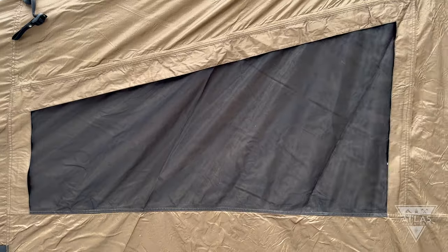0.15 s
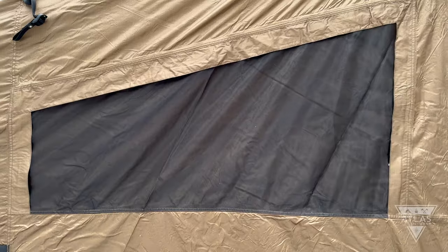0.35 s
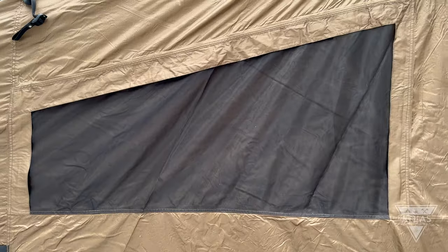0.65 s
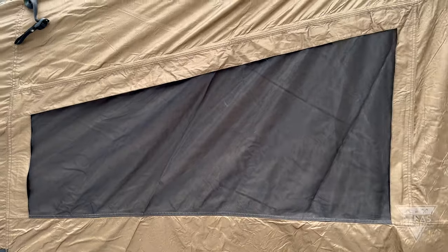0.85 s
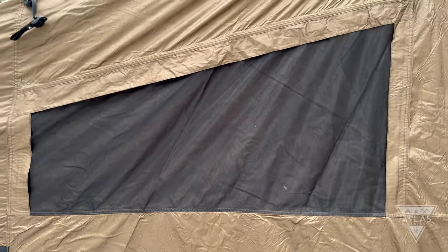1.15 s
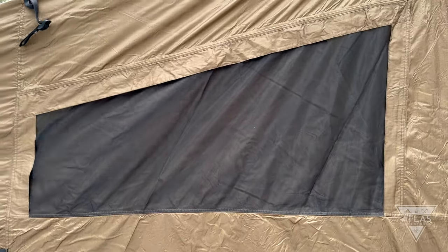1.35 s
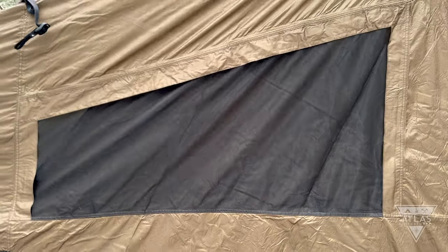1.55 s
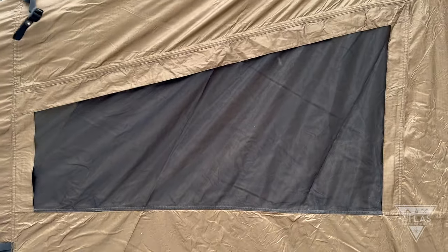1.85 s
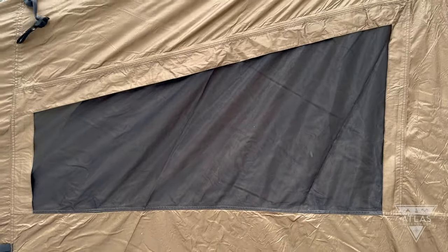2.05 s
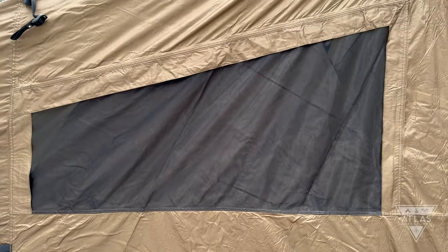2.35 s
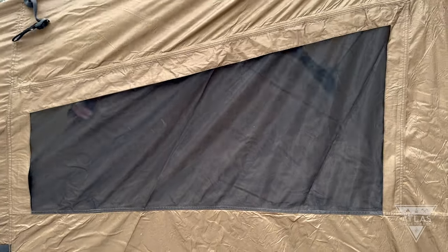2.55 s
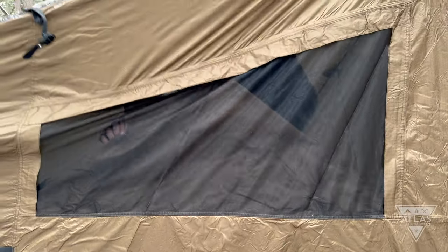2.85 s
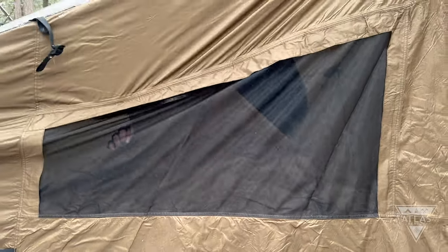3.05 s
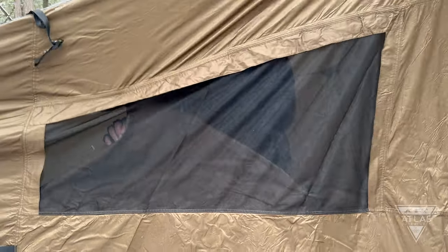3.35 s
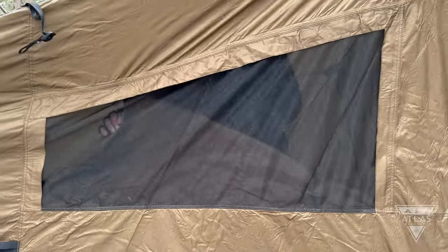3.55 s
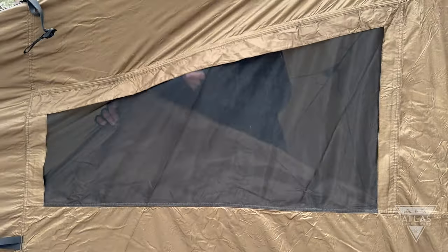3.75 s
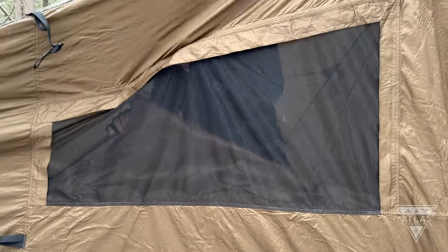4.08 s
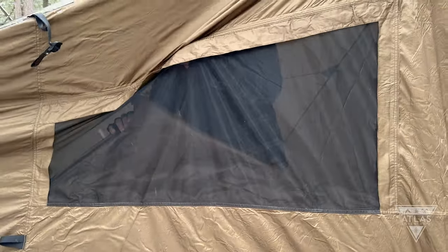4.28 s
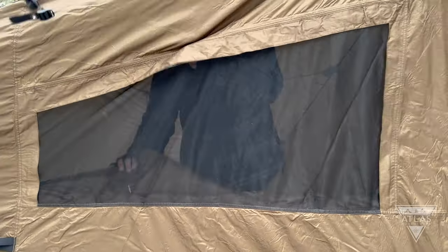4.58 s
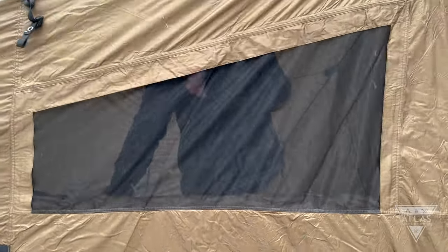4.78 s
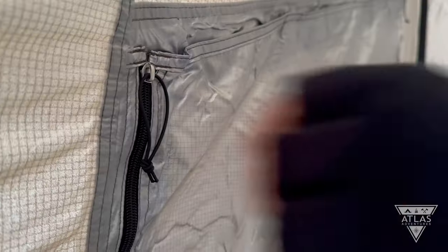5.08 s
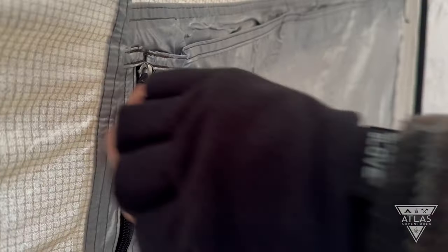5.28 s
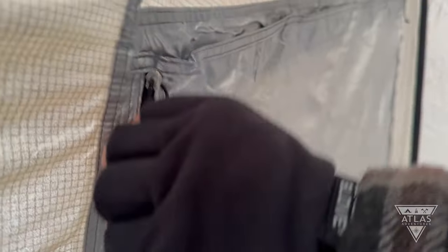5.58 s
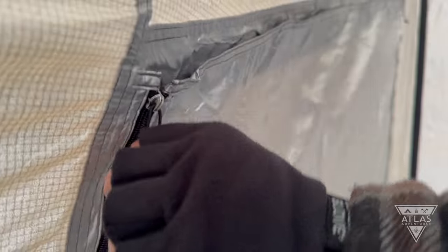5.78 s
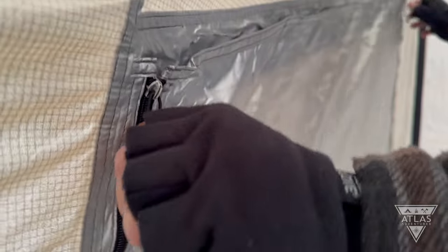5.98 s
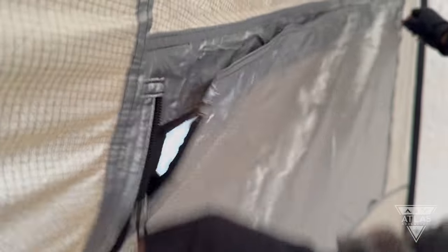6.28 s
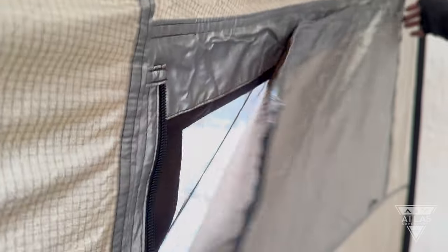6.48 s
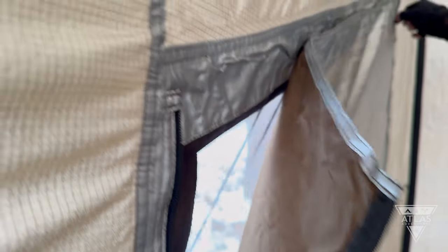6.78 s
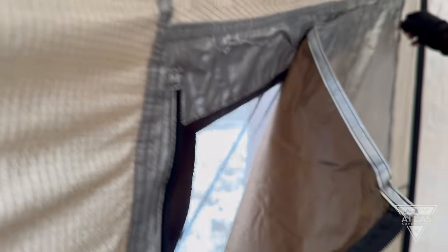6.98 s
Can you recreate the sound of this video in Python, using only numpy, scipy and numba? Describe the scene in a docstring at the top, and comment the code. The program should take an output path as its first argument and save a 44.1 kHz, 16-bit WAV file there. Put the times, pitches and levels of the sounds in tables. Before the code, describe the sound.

A nylon tent window is opened, all close to the microphone. A zipper rasps from the start until about 0.7 seconds, then again in a quicker, slightly louder pull from 1.1 to 1.4 seconds. The fabric crinkles with small snaps. From 2.3 to 2.5 seconds a hook-and-loop strip tears apart in sharp crackles, continuing from 2.7 to 3.2 seconds over swishing nylon. After a few crease snaps, three more short rips come between 4.0 and 4.4 seconds, the last the loudest, with a dull crumple and a low thump. The fabric keeps sliding and ticking. From about 5.3 seconds a gloved hand bumps the taut wall with soft, deep thuds, and a pull tab clicks at 5.7 seconds. A nearer zipper runs from 6.2 to 6.7 seconds over low drumming of the wall, followed by a faint swish and a soft bump around 7 seconds.

```python
"""Opening a tent window

Two pulls of a zip, hook-and-loop strips torn apart, then a nearer zip, all close to the microphone.
Zip teeth swing the tape and knock the slider; hooks let go in groups that ring the strip.
Nylon swishes and its creases snap in between, and the taut wall drums under a gloved hand."""
import sys
import numpy as np
from scipy import signal
from scipy.fft import rfft, irfft
from scipy.io import wavfile
from scipy.ndimage import uniform_filter1d
from numba import njit

SR = 44100
rng = np.random.default_rng(int(sys.argv[2]) if len(sys.argv) > 2 else 0)


def dump(signal):
    """Clip the signal to [-1, 1] and save it as 16-bit WAV at the path in sys.argv[1]."""
    limited = np.clip(np.atleast_2d(signal).T, -1, 1)
    pcm = np.round(limited * 32767).astype(np.int16)
    wavfile.write(sys.argv[1], SR, pcm)


N = 314433

# t/s, tooth rate/Hz, tape hum/dB, slider rasp/dB
FIRST_PULL = [(0.07, 197.8, -71, -57.5), (0.142, 292.8, -52, -56), (0.23, 557, -50, -46.5),
              (0.316, 671.9, -51.5, -44.5), (0.42, 620.2, -51.5, -43.5), (0.474, 596, -53, -46),
              (0.526, 660.3, -49.5, -45), (0.59, 589.3, -55.5, -43.5), (0.664, 431, -46, -49.5),
              (0.675, 438.5, -58, -79)]
SECOND_PULL = [(1.148, 278, -47, -55.5), (1.168, 284.5, -47.5, -50), (1.194, 495, -43, -44.5),
               (1.224, 584, -45, -37.5), (1.255, 598.6, -51.5, -37.5), (1.33, 637.6, -48.5, -40),
               (1.394, 658.4, -55, -36.5), (1.414, 613, -40, -39), (1.428, 603, -46, -47)]
NEAR_PULL = [(6.183, 131.5, -57.5, -50.5), (6.203, 193.3, -37, -44), (6.223, 251.2, -40, -43),
             (6.295, 386.8, -47, -40.5), (6.353, 279.9, -50, -44), (6.489, 443.6, -44.5, -44.5),
             (6.529, 299.5, -48, -44.5), (6.571, 355.5, -45, -44.5), (6.613, 267.6, -49, -57.5),
             (6.661, 267, -42.5, -57.5), (6.705, 254, -47, -67)]
# f/Hz, width/Hz, level/dB
SLIDER_MODES = [(1670, 1070, -4), (2810, 290, -0.5), (3950, 1500, 4)]


def zip_pull(pull, wobble, jitter, tooth_decay, knock_db, surge_db, overtones_db, treble_db,
             rattle_db, settle_db_per_s):
    """Each tooth swings the tape once (hum), knocks the slider and scrapes past it (rasp)."""
    tooth_hz, hum_db, rasp_db = curves(pull)
    t = np.arange(N) / SR
    start_s, end_s = pull[0][0], pull[-1][0]
    moving = np.clip(np.minimum(t - start_s, end_s - t) / 0.00088 + 1, 0, 1)
    # wobble: uneven hand; jitter: single teeth catch or slip
    phase = np.cumsum(tooth_hz * (1 + wobble * walk(70) + jitter * walk(500))) / SR
    tooth = phase.astype(int)
    strength = undb(1.25 * rng.standard_normal(N // 20)[tooth % (N // 20)])
    knocks = undb(knock_db) * unit(np.diff(tooth, prepend=0) * strength)
    scrape = unit(strength * np.exp(-tooth_decay * (phase % 1)))

    def drive():
        """Shared knocks, fresh scrape noise for each part."""
        return knocks + scrape * rng.standard_normal(N)

    slider = np.zeros(N)
    for k, (hz, width_hz, db) in enumerate(SLIDER_MODES):
        gain = undb(db + surge_db * walk(25))  # the grip on the tab damps unevenly
        slider += (-1) ** k * gain * band(drive(), hz * (1 + 0.07 * walk(13)), width_hz)
    treble = band(drive(), 5000 * (1 + 0.08 * walk(12)), 3100)
    treble = unit(band(treble, 6500, 8700)) * undb(1.2 * walk(20))
    # the tape rattles most when slow and slack
    slack_db = -1.5 * np.log2(tooth_hz / 400) - settle_db_per_s * (t - start_s)
    rattle = unit(band(drive(), 504, 700)) * undb(walk(40) + slack_db)
    hum = np.sqrt(2) * np.sin(2 * np.pi * phase) * undb(4.2 * walk(110))
    # overtones of the lopsided swing
    buzz = sum(undb(db + 3.4 * walk(40)) * np.sin(2 * np.pi * harmonic * phase)
               for harmonic, db in enumerate(overtones_db, start=2))
    tape = hum - undb(rattle_db) * rattle
    rasp = unit(slider) + buzz + undb(treble_db) * treble
    return moving * (undb(hum_db) * tape + undb(rasp_db) * rasp)


# hooks letting go: t/s, level/dB, length/ms
HOOK_GROUPS = [(2.2889, -18, 1.5), (2.2919, -15, 1.1), (2.3205, -23.5, 1), (2.3258, -19, 3.1),
               (2.3345, -20, 1.14), (2.3566, -19.5, 4.4), (2.366, -32.5, 4.5), (2.386, -19, 1.5),
               (2.3907, -23, 3.5), (2.397, -21, 2), (2.4039, -25, 4.25), (2.4216, -28, 3.8),
               (2.4278, -23, 3.2), (2.4396, -25, 7), (2.4517, -25, 6), (2.46, -26.5, 6.7),
               (2.4692, -20.5, 2.9), (2.4794, -19.5, 1.8), (2.491, -23.5, 3.8), (2.6867, -28.5, 0.74),
               (2.6922, -23, 2.5), (2.7417, -35, 1.4), (2.7603, -15, 1.23), (2.7637, -26.5, 1.9),
               (2.7744, -21, 2), (2.7785, -18, 2.8), (2.8035, -19.5, 1.9), (2.815, -14.5, 1.5),
               (2.8596, -23, 3.8), (2.884, -21, 0.62), (2.8888, -24.5, 1.3), (2.9019, -20.5, 1.4),
               (2.906, -22, 1.24), (2.921, -10, 0.67), (2.9239, -22, 1.5), (2.937, -19, 1.4),
               (2.9428, -26.5, 1.8), (2.9699, -20, .94), (2.9888, -20, 0.57), (2.9941, -17, 1.14),
               (3.0118, -32.5, 1.05), (3.0596, -30, 2.7), (3.0632, -22, 1.4), (3.0668, -18.5, 3.4),
               (3.0746, -27, 2.9), (3.1226, -23, 5.1), (3.1259, -26, 4), (3.131, -27, 5.6),
               (3.1393, -20.5, 2.4), (3.1457, -19.5, 4.3), (3.15, -24.5, 1.9), (3.1615, -19.5, 2.2),
               (3.1874, -17.5, 5.15), (3.3254, -25, 1.03), (3.9998, -19, 0.94), (4.0376, -35, 1.6),
               (4.099, -14, 3.7), (4.106, -10.5, 2.8), (4.1167, -17, 1.6), (4.125, -24, 1.3),
               (4.1676, -22.5, 1.44), (4.1816, -31, 2), (4.1854, -22, 2.8), (4.1905, -17, 3.6),
               (4.1993, -15, 4.85), (4.205, -25, 2.7), (4.2132, -19, 1.6), (4.2255, -16.5, 1.7),
               (4.3067, -36, 1.8), (4.3251, -15, 1.2), (4.328, -16, 2.4), (4.331, -23.5, 5.8),
               (4.3377, -8, 3.9), (4.3417, -19.5, 7.2), (4.3494, -14, 10.2)]
# stretches coming free: start/s, end/s, first ring/Hz, last ring/Hz, bass/dB, treble/dB (both re level)
STRIP_TEARS = [(2.285, 2.388, 3330, 3370, -13, -35), (2.393, 2.494, 2980, 2540, -9.5, -18),
               (2.68, 2.825, 3350, 3700, -14.5, -12), (2.826, 3.02, 2860, 3040, -10, -4),
               (3.055, 3.21, 2680, 2480, -12.5, -4), (3.99, 4.124, 3230, 2990, -20, -5.5),
               (4.164, 4.238, 2950, 3170, -20.5, -2.5), (4.31, 4.4, 3080, 3300, -20, -1)]
STRAY_DB, STRAY_MAX_LAG_S, STRAY_MS = -12.5, 0.02, 0.68
HOOK_SCATTER_DB, HOOK_BASS_DB_PER_DOUBLING = 3.0, 2.5


def hook_and_loop():
    """Hooks let go in groups, each trailed by a stray; the ring follows the strip as it comes free."""
    start_s, end_s, first_hz, last_hz, bass_db, treble_db = np.transpose(STRIP_TEARS)
    s, db, ms = np.transpose(HOOK_GROUPS)
    lag, drop = rng.random((len(s), 2)).T
    s = np.r_[s, s + STRAY_MAX_LAG_S * lag]
    db = np.r_[db, db + STRAY_DB - 9 * drop]
    ms = np.r_[ms, np.full(len(ms), STRAY_MS)]
    ring_scatter, bass_scatter, treble_scatter = rng.standard_normal((len(s), 3)).T
    edges_s = np.ravel([start_s, end_s], "F")
    hz = np.interp(s, edges_s, np.ravel([first_hz, last_hz], "F")) * (1 + 0.07 * ring_scatter)
    bass_db = np.interp(s, edges_s, np.repeat(bass_db, 2)) + HOOK_SCATTER_DB * bass_scatter
    bass_db += HOOK_BASS_DB_PER_DOUBLING * np.log2(ms)  # longer groups tug the cloth harder
    treble_db = np.interp(s, edges_s, np.repeat(treble_db, 2)) + HOOK_SCATTER_DB * treble_scatter
    events = np.transpose([s, db, hz, bass_db, treble_db, ms])
    return cracks(events, bass_hz=860, bass_width_hz=1340, ring_width_hz=2360, spread_db=2.5)


# crease snaps and pull-tab taps: t/s, level/dB, bass/dB re level, ring/Hz
CREASE_SNAPS = [(0.7806, -51.5, 8.5, 2470), (0.8097, -50, 2, 2040), (0.8757, -38.5, 1, 3920),
                (0.9306, -48, 7, 2430), (1.1036, -55, 4, 2020), (1.1203, -47.5, 10, 1710),
                (1.494, -45, 0, 3320), (1.6005, -37, 5, 4014), (1.6205, -34, -23, 1950),
                (1.6424, -43, 3, 1880), (1.6638, -41, -12, 2200), (1.6746, -53, 16, 3100),
                (1.7115, -53, 11, 2060), (1.745, -53, 0, 2330), (1.7835, -48.5, -5, 1980),
                (1.829, -51.5, 3, 2080), (2.0093, -70, -9.5, 2050), (2.0612, -56.5, 8.5, 1710),
                (3.4258, -40, 2, 3600), (3.51, -43, -13, 3800), (3.613, -39, -18, 3800),
                (3.6875, -43, 3, 3180), (3.7102, -40.5, -10, 1990), (3.8055, -33.5, -15, 3300),
                (3.9037, -35, -15, 3370), (4.4592, -39, -4, 3380), (4.6146, -37.5, 4, 3560),
                (4.8509, -42.5, 9.5, 3650), (5.0344, -47, 12, 4040), (5.048, -57, -9, 3560),
                (5.071, -52.5, 5, 3990), (5.0992, -48, 15, 4170), (5.1233, -41, 3, 4050),
                (5.3251, -56, 5, 3820), (5.448, -47.5, 14, 1890), (5.7042, -43, -2, 3130),
                (5.7144, -30.5, -6.5, 3640), (5.8263, -44.5, 9, 3720), (6.9225, -54.5, -24.5, 1895),
                (7.0818, -60, 1.5, 3840)]
SNAP_TREBLE_DB, SNAP_MS = -16, 1.3


def creases(faint_count):
    """Cold nylon snaps and the tab taps, each with its own ring, among faint random ticks."""
    faint = rng.uniform([0, -57.5, -10, 1800], [N / SR - 0.01, -52.5, 2, 4000], (faint_count, 4))
    events = [(s, db, hz, bass_db, SNAP_TREBLE_DB, SNAP_MS)
              for s, db, bass_db, hz in CREASE_SNAPS + faint.tolist()]
    return cracks(events, bass_hz=690, bass_width_hz=510, ring_width_hz=2100, spread_db=-3.0)


def cracks(events, bass_hz, bass_width_hz, ring_width_hz, spread_db):
    """Each event is a quick run of tiny releases that rings and thuds in the fabric."""
    slips = grit(spread_db)
    drives = np.zeros((3, N))
    ring_hz = np.full(N, 3000.)
    for s, db, hz, bass_db, treble_db, ms in sorted(events, key=lambda event: event[0]):
        i, length = int(s * SR), int(ms * SR / 1000)
        run = slips[i:i + length].copy()
        run[0] = 4.5  # the first release is a clean click
        drives[:, i:i + length] += undb(db + np.array([[0], [bass_db], [treble_db]])) * unit(run)
        ring_hz[i:] = hz
    ring_drive, bass_drive, treble_drive = drives
    ring = band(ring_drive, ring_hz, ring_width_hz)
    bass = band(bass_drive, bass_hz, bass_width_hz)
    thud = band(band(bass_drive, 260, 190), 270, 400)
    treble = band(band(treble_drive, 8770, 9000), 9500, 22000)
    return undb(4) * ring + undb(9) * bass + undb(3) * thud + undb(5) * treble


# t/s, hold/s, crumple/dB, swish/dB
CLOTH_MOVES = [(0.0, 0.051, -63, -70), (0.689, 0.055, -61.5, -82.5), (.78, 0.0257, -65, -66),
               (0.848, 0.05, -60, -56.5), (0.947, 0.066, -64, -92), (1.062, .08, -64.5, -82),
               (1.435, 0.14, -64, -71), (1.6, 0.076, -56.5, -68), (1.708, 0.062, -60, -76.5),
               (1.825, 0.0092, -59.5, -81), (2.003, 0.0076, -62, -87), (2.063, 0.046, -52.5, -57),
               (2.128, 0.039, -46, -48), (2.215, 0.088, -54.5, -50), (2.5, 0.035, -46.5, -51),
               (2.569, 0.096, -52, -55), (2.719, 0.62, -54.5, -52), (3.178, 0.092, -57, -80),
               (3.337, 0.11, -57.5, -88), (3.464, .11, -60.5, -97), (3.601, 0.035, -51.5, -57.5),
               (3.68, 0.093, -57.5, -61.5), (3.799, .16, -53, -48.5), (4.025, .09, -57, -52.5),
               (4.126, 0.09, -58, -48), (4.22, 0.088, -69, -56.5), (4.342, 0.059, -34, -53),
               (4.457, 0.036, -50, -51.5), (4.536, 0.11, -52, -49), (4.656, 0.1, -56.5, -60),
               (4.781, .2, -61.5, -50), (4.995, 0.13, -57, -53), (5.165, 0.12, -89, -58),
               (5.354, 0.018, -47.5, -52.5), (5.428, 0.03, -66.5, -71), (5.499, 0.15, -68.5, -57),
               (5.714, 0.0064, -55, -65), (5.753, 0.031, -52.5, -46), (5.845, 0.07, -92, -64),
               (5.97, 0.089, -69.5, -59.5), (6.083, 0.074, -69, -56.5), (6.72, .14, -77, -65.5),
               (6.866, 0.053, -84, -73.5), (6.974, 0.23, -85, -68.5)]
# f/Hz, level/dB
CRUMPLE_SPECTRUM = [(100, -14), (250, 1), (600, -2.5), (1200, -6), (2500, -13.5)]
# top band of the swish: t/s, level/dB re swish
SWISH_SHEEN = [(0.0, -18), (2.0, -20), (2.06, -0.5), (2.6, -4), (3.3, -14), (3.5, -30), (3.8, -4.5),
               (4.3, -7.5), (4.45, -1), (4.9, -4.5), (5.3, 1), (5.7, -2), (6.15, -3.5), (6.75, -4),
               (7.13, -15.5)]
REST_CRUMPLE_DB, REST_SWISH_DB = -74, -76.5


def cloth():
    """Folding nylon crumples dully; sliding nylon gives a fine, uneven swish."""
    s, hold_s, crumple_db, swish_db = np.transpose(CLOTH_MOVES)
    folding = undb(REST_CRUMPLE_DB) + gestures(s, hold_s, crumple_db, attack_s=0.013, t60_s=0.15)
    sliding = undb(REST_SWISH_DB) + gestures(s, hold_s, swish_db, attack_s=0.013, t60_s=0.28)
    crumple = unit(colour(grit(2.5) * undb(3.2 * walk(45)), CRUMPLE_SPECTRUM))
    friction = grit(2.5) * undb(2.7 * walk(25))
    swish = unit(band(friction, 6000, 2900))
    sheen = unit(band(band(friction, 11000, 8200), 9000, 11000))
    sheen_db = curves(SWISH_SHEEN)[0] + 2.0 * walk(16)
    return folding * crumple + sliding * (swish + undb(sheen_db) * sheen)


# t/s, level/dB, hold/s
HAND_PUSHES = [(2.3, -58, 0.14), (2.45, -43.5, 0.032), (2.8, -62, 0.018), (2.96, -70, .02),
               (3.09, -51, 0.13), (3.65, -72, .1), (4.11, -63, 0.036), (4.347, -42.5, 0.052),
               (4.55, -66, 0.08), (4.89, -72, 0.013), (5.179, -74, 0.016), (5.341, -47, 0.082),
               (5.5, -56, 0.088), (5.705, -37.5, 0.013), (5.978, -57, 0.0069), (6.09, -65, 0.011),
               (6.18, -43, 0.205), (6.46, -54, 0.32), (6.829, -57, 0.1), (7.08, -51.5, .05)]
# f/Hz, width/Hz, level/dB
TAUT_WALL_MODES = [(45.74, 27, 6.5), (79.3, 45.6, -2), (122.1, 130, -10.5)]
WALL_REST_DB, MIC_CLOSE_AT_S, FAR_LOWEST_MODE_DB = -69, 5.0, -9


def wall():
    """A gloved hand rings the taut wall's low modes; the lowest is fainter until the mic is close."""
    s, push_db, hold_s = np.transpose(HAND_PUSHES)
    stir = undb(WALL_REST_DB + 5.1 * walk(6.4))
    force = stir + gestures(s, hold_s, push_db, attack_s=0.022, t60_s=0.26)
    noise = rng.standard_normal(N)
    lowest, *upper = (undb(db) * band(band(noise, hz, width_hz), hz, 2 * width_hz)
                      for hz, width_hz, db in TAUT_WALL_MODES)
    lowest_db = np.where(np.arange(N) < MIC_CLOSE_AT_S * SR, FAR_LOWEST_MODE_DB, 0)
    ring = undb(lowest_db) * lowest + sum(upper)
    running_rms = np.sqrt(uniform_filter1d(ring ** 2, size=4000))
    return force * ring / running_rms


def tent_echo(x, t60_s, level_db):
    """Short flutter back from the tent walls."""
    t = np.arange(int(0.2 * SR)) / SR
    flutter = rng.standard_normal(len(t)) * undb(-60 * t / t60_s) * (t > 0.002)
    echo = signal.fftconvolve(x, flutter / np.sqrt(np.sum(flutter ** 2)))[:N]
    return undb(level_db) * band(echo, 2500, 8300)


def undb(db):
    """Decibels to gain."""
    return 10 ** (np.asarray(db) / 20)


def unit(x):
    """Scaled to rms 1."""
    return x / np.sqrt(np.mean(x ** 2))


def curves(table):
    """Columns after t/s, interpolated to N samples."""
    s, *columns = np.transpose(table)
    return [np.interp(np.arange(N) / SR, s, column) for column in columns]


def gestures(times_s, holds_s, levels_db, attack_s, t60_s):
    """Summed rise-hold-decay envelopes, each at full level from its time."""
    t = np.arange(N) / SR
    gain = np.zeros(N)
    for s, hold_s, db in zip(times_s, holds_s, levels_db):
        rise = np.clip((t - s) / attack_s + 1, 0, 1)
        gain += rise * undb(db - 60 * np.maximum(t - s - hold_s, 0) / t60_s)
    return gain


def walk(rate_hz):
    """Random steps, smoothed twice; rms 1."""
    hold = int(SR / rate_hz)
    steps = np.repeat(rng.standard_normal(N // hold + 1), hold)
    return unit(uniform_filter1d(uniform_filter1d(steps, hold), hold)[:N])


def grit(spread_db):
    """Long-tailed noise: many tiny slips, a few big ones."""
    return unit(rng.standard_normal(N) * undb(spread_db * np.minimum(rng.exponential(size=N), 5.5)))


@njit
def svf(x, hz, width_hz):
    """State-variable band-pass, gain 1 at its moving centre."""
    y, band_state, low_state = np.empty(len(x)), 0., 0.
    for i in range(len(x)):
        g, damping = np.tan(np.pi * hz[i] / SR), width_hz / hz[i]
        v = (band_state + g * (x[i] + 1e-18 - low_state)) / (1 + g * (g + damping))
        band_state = 2 * v - band_state
        low_state += 2 * g * v
        y[i] = damping * v
    return y


def band(x, hz, width_hz):
    """Band-pass at a steady or moving centre."""
    return svf(x, hz * np.ones(N), float(width_hz))


def colour(x, points):
    """Minimum-phase filter through (f/Hz, level/dB) points, by folded cepstrum."""
    hz, db = np.transpose(points)
    size = 4096
    bin_hz = np.arange(size // 2 + 1) * SR / size
    bin_db = np.interp(np.log(bin_hz + 1), np.log(hz), db)
    cepstrum = irfft(bin_db * np.log(10) / 20)
    cepstrum[1:size // 2] *= 2
    cepstrum[size // 2 + 1:] = 0
    return signal.fftconvolve(x, irfft(np.exp(rfft(cepstrum))))[:N]


def scene():
    """Mono mix; only the sharp sounds echo."""
    zips = zip_pull(FIRST_PULL, wobble=0.065, jitter=0.055, tooth_decay=1.7, knock_db=-3.0, surge_db=4.0,
                    overtones_db=(-6, -6, -10), treble_db=-15, rattle_db=2.0, settle_db_per_s=1.0)
    zips += zip_pull(SECOND_PULL, wobble=0.076, jitter=0.055, tooth_decay=0.9, knock_db=-3.5,
                     surge_db=2.2, overtones_db=(-8, -7, -10), treble_db=-9.5, rattle_db=3.5,
                     settle_db_per_s=-1.0)
    zips += zip_pull(NEAR_PULL, wobble=0.044, jitter=0.07, tooth_decay=2.7, knock_db=-21.5,
                     surge_db=2.2, overtones_db=(-8, -12, -16), treble_db=3, rattle_db=0.0,
                     settle_db_per_s=14.5)
    sharp = zips + hook_and_loop() + creases(faint_count=60)
    return (sharp + tent_echo(sharp, t60_s=0.074, level_db=-15) + cloth() + wall())[None]


# f/Hz, level/dB
MIC_RESPONSE = [(20, -11.5), (40, 2), (2200, 2.5), (3000, 1), (3700, 3), (4200, -2), (4900, -7.5),
                (6300, -10), (9000, -13), (12500, -12.5), (16000, -18)]
CUTOFF_HZ = 16200


def record(dry):
    """A small camera's microphone: the port rings near 4 kHz; the top is cut."""
    lowpass = signal.ellip(10, 0.2, 70, CUTOFF_HZ, fs=SR, output="sos")
    return signal.sosfilt(lowpass, colour(dry[0], MIC_RESPONSE))[None]


dry = scene()
out = record(dry)
dump(out)
```